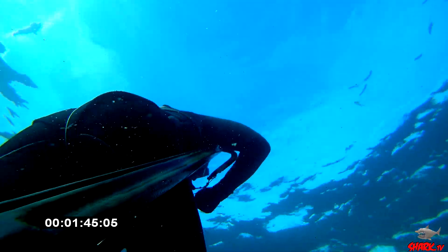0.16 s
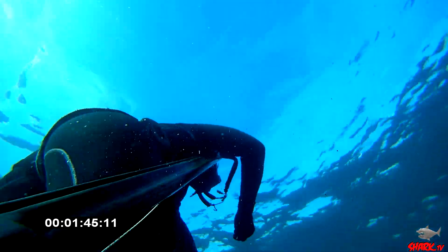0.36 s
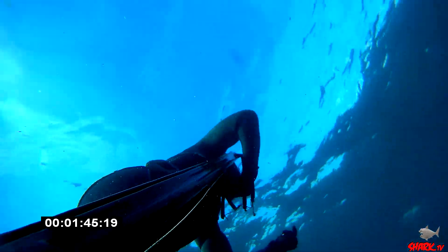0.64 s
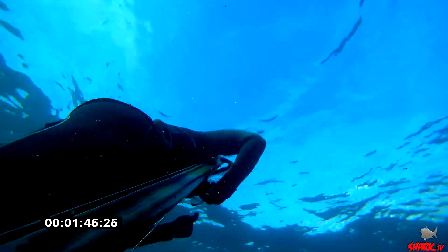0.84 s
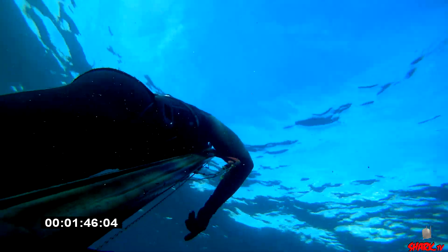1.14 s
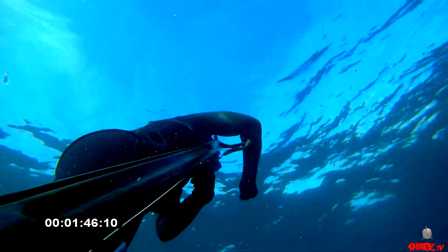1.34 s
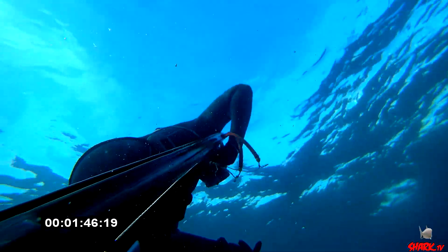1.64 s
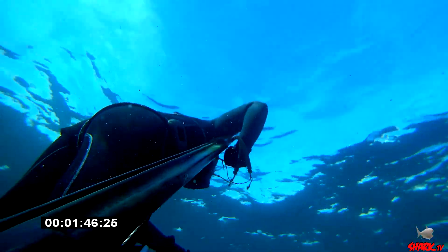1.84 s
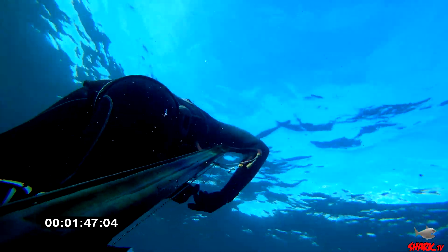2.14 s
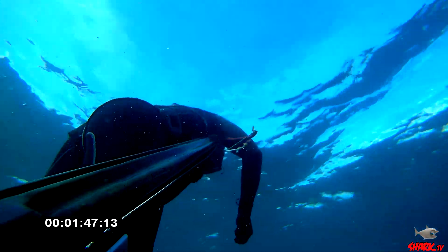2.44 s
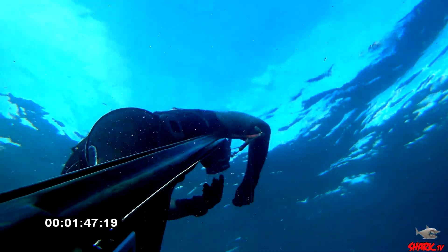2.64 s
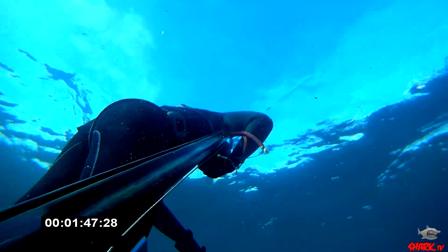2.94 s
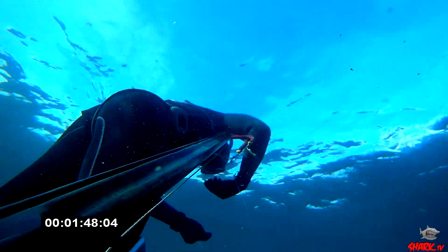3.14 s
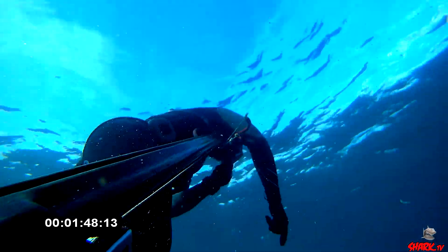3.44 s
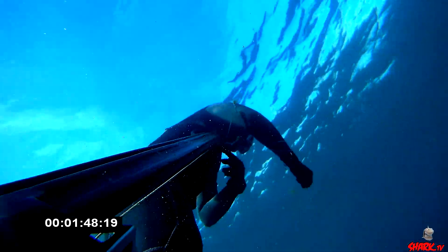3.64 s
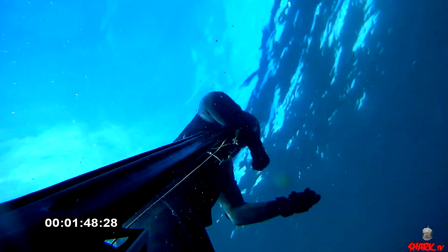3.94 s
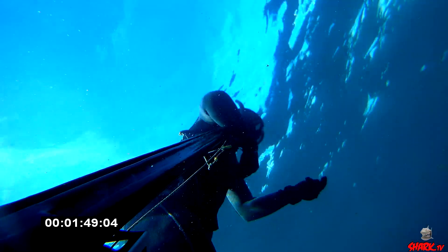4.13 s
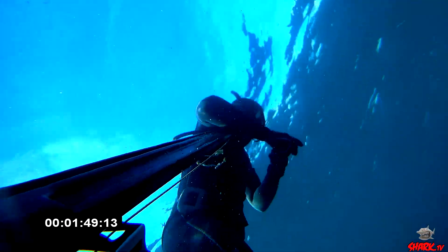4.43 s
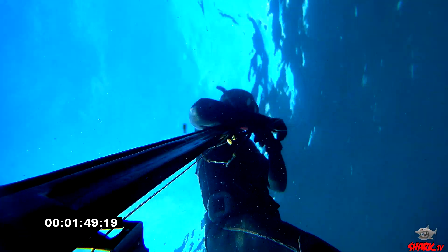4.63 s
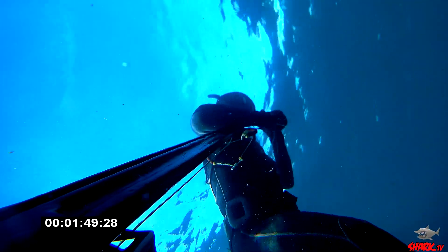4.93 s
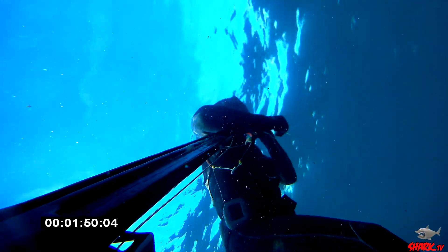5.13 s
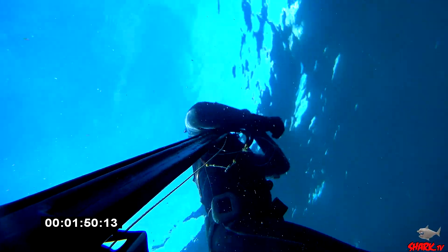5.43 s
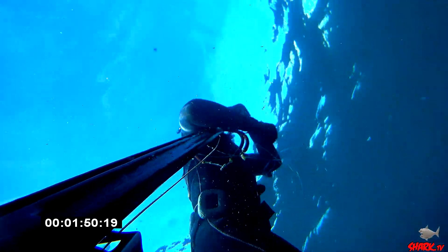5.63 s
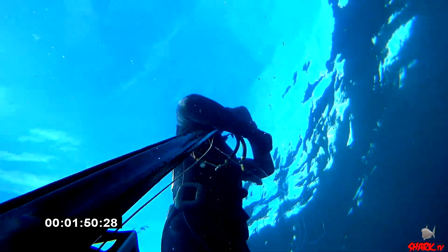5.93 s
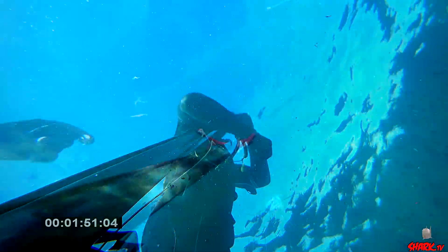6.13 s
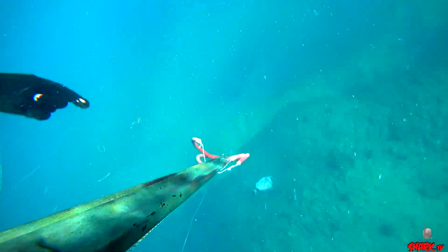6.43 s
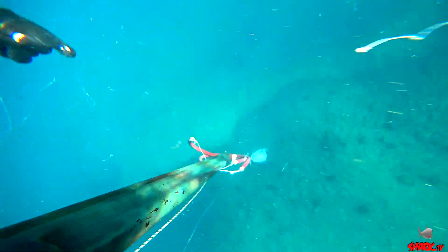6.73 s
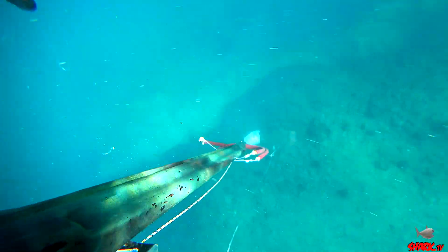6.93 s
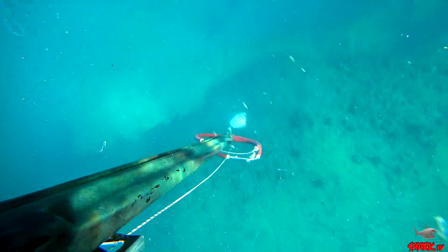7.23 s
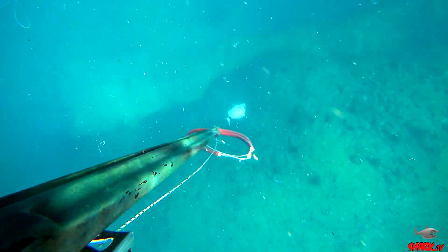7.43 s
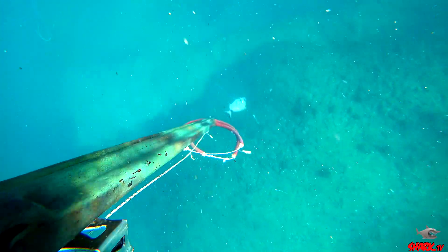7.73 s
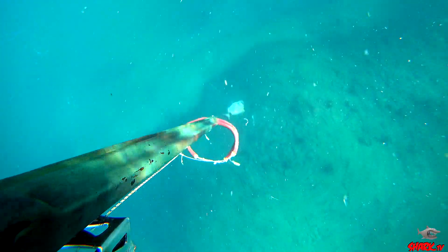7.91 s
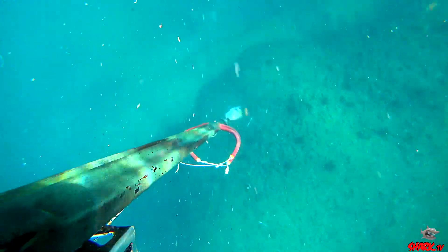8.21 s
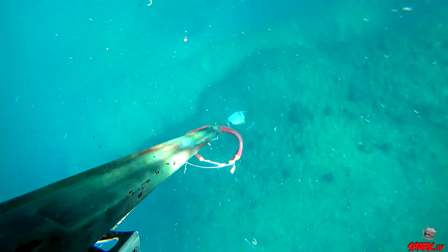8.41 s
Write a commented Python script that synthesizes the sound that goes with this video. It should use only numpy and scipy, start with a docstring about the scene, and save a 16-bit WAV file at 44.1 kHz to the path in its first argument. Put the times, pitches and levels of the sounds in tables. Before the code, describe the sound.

A speargun is handled under water, heard through its body by two attached microphones. Low shuddering and thumps dominate the first three seconds, broken by a hard pressure-like snap. Woody, hollow knocks cluster again around four seconds; things calm at five. Later come small taps, short ringing pings, line rubbing and a tiny thin squeak. Dry crackling ticks and faint hiss continue throughout, wide and without room echo.

```python
"""Under water, a speargun's barrel hums low over a soft sea hiss, then hands and line rub and knock the gun.
Near the start one sharp snap jolts the sealed camera housing that it carries; snapping shrimp tick all round.
The hum is two wavering tones; knocks, scrapes and rubbing are noise that rings the modes of gun and housing.
Sound borne by the gun shakes the two microphone ports mostly in opposite directions;
ticks are noise bursts that ring the housing window, and the sea is shaped noise."""
import sys
import numpy as np
from scipy import signal
from scipy.io import wavfile
from scipy.ndimage import uniform_filter1d

SR = 44100
rng = np.random.default_rng(int(sys.argv[2]) if len(sys.argv) > 2 else 0)


def to_wav(s):
    """Save 16-bit WAV."""
    ch = np.atleast_2d(s).T  # columns
    pcm = np.round(np.clip(ch, -1, 1) * 32767)  # PCM
    wavfile.write(sys.argv[1], SR, pcm.astype(np.int16))


N = 377915

# Modes of gun and housing: [f/Hz, damping/Hz (decay rate over 2 pi), left level/dB, right level/dB,
# lead of the inverted right port/rad]
GUN_MODES = [(114, 38, -22, -11.5, -0.15), (216, 24.7, -13, 2.5, -0.14), (281, 22.4, -4, 3, 0.47),
             (411.5, 51.4, -6, -1.5, -0.2), (484, 41, -8.5, -9.5, 0.23), (589, 48, -4, -17, 0.029),
             (641.6, 45.6, 3.5, -4.5, 0.36), (687.4, 76, 1, 0.5, 0.071), (861, 49, -3.5, -8.5, -0.27),
             (963, 40.4, -8, -3.5, -0.71), (1060, 68, -12, -10.5, -0.65), (1258, 63, -24, -16, -1.2),
             (1516, 102, -17.5, -21, -1.33), (1944, 170, -18.5, -19, -0.98), (2820, 310, -29.5, -30, 1),
             (3690, 530, -41, -37, 1), (5100, 1030, -41, -38.5, 1)]
MODE_HZ = np.array(GUN_MODES)[:, 0]
HIGH = MODE_HZ > 540
# harder contact favours the higher modes more, up to 2 kHz
HARDNESS = HIGH * (1 + 0.48 * np.log2(np.minimum(MODE_HZ, 2000) / 640))


def amp(db):
    """Amplitude ratio of a level in dB."""
    return 10 ** (np.asarray(db) / 20)


def evened(x):
    """Scale to rms 1."""
    return x / np.sqrt(np.mean(x ** 2) + 1e-20)


def add(mix, s, sound):
    """Lay a sound into the mix at s seconds, cut off at the end."""
    part = mix[:, round(s * SR):][:, :sound.shape[1]]
    part += sound[:, :part.shape[1]]


def wander(rate_hz):
    """Slow chance of rms 1: sines up to rate_hz, the slower ones larger."""
    t = np.arange(0, N + 64, 64) / SR
    slow = sum(np.sin(2 * np.pi * (f * t + rng.random())) / np.sqrt(f)
               for f in rate_hz * np.geomspace(.05, 1, num=24))
    return np.interp(np.arange(N) / SR, t, evened(slow))


def gestures(rows, index, rise_s, sag_db_s, fall_db_s):
    """Power of gestures that rise, sag gently while held, then fall away."""
    power, t = np.zeros((1, N)), np.arange(2 * SR) / SR
    for row in rows:
        start, length = row[:2]
        fade_db = sag_db_s * t + fall_db_s * np.maximum(t - length, 0)
        level = np.minimum(t / rise_s, 1) * amp(row[index] - fade_db)
        add(power, start, level[None] ** 2)
    return power[0]


def drift_db():
    """How much the gun drifts in the hand between swings."""
    # Drift of the slow sway: [t/s, level/dB]
    drift_points = [(0, -36), (1.5, -31), (2.8, -35.5), (4.1, -37.5), (5.2, -51.5), (6.2, -40.5),
                    (8.57, -40)]
    return np.interp(np.arange(N) / SR, *np.transpose(drift_points))


def sway_levels():
    """Size of the slow and the fast sway: the drift plus the swings."""
    # Swings of the barrel: [start t/s, length/s, slow sway level/dB, fast sway level/dB]
    swing_rows = [(0.0, 0.15, -56.5, -29.5), (0.41, 0.36, -17, -20), (1.14, 0.22, -21, -15),
                  (1.66, 0.2, -24.5, -36), (1.81, 0.33, -17, -18), (2.26, 0.31, -20, -23),
                  (3.33, 0.43, -49, -31), (3.72, 0.19, -34.5, -32), (4.48, 0.12, -40.5, -29.5),
                  (6.42, 0.44, -38.5, -36), (7.82, 0.072, -26.5, -33)]
    rise_s, sag_db_s, fall_db_s = 0.024, (4, 40.5), (112, 134)  # slow and fast sway
    fast_db, fast_growth = -4.5, 1.124  # the fast sway lies lower and follows the drift more steeply
    drift = drift_db()
    fast_drift = fast_db + drift + (fast_growth - 1) * (drift - drift.max())
    rest = amp([drift, fast_drift])
    swung = [gestures(swing_rows, 2 + k, rise_s, sag_db_s[k], fall_db_s[k]) for k in range(2)]
    return np.sqrt(rest ** 2 + swung)


def sway(levels):
    """The barrel bends at wavering pitches; large swings push the two membranes out of their linear range."""
    # Bending of the barrel: [f/Hz, wavering of f/Hz, left over right level/dB]
    bends = [(26.5, 1, -6), (48, 6.5, -7)]
    out = np.zeros((2, N))
    for (hz, wavering, pan_db), level in zip(bends, levels):
        phase = 2 * np.pi * np.cumsum(hz + wavering * wander(9)) / SR
        tone = np.sin(phase) * amp(3.34 * wander(33))
        sides = amp([[pan_db / 2], [-pan_db / 2]])
        out += evened(tone) * level * sides / sides.mean()
    # the squared swing bends the ports in opposite directions
    warp = signal.sosfilt(signal.butter(2, 14, "high", fs=SR, output="sos"), out.mean(0) ** 2)
    stiff = 0.21  # the left membrane stiffens towards this swing
    out[0] = stiff * np.tanh(out[0] / stiff)
    return out + 4.9 * warp * np.array([[-1], [1]])


def buffeting(levels):
    """Water shoved past with the fast sway thumps each port on its own: low noise in a narrow band."""
    band = signal.butter(2, [68, 100], "band", fs=SR, output="sos")
    thumps = signal.sosfilt(band, rng.standard_normal((2, N)))
    lumpy_db = 3
    return amp([[-8], [-6]]) * evened(thumps * amp(lumpy_db * wander(25))) * levels[1]


def rings():
    """Impulse response of each gun mode at the two ports, with a soft start that keeps its skirts steep."""
    hz, damping, left_db, right_db, lead = np.transpose(GUN_MODES)[:, :, None]
    t = np.arange(SR // 5) / SR
    fade, turn = 2 * np.pi * damping * t, 2 * np.pi * hz * t
    sign = (-1.) ** np.arange(len(GUN_MODES))[:, None]  # neighbours swing in opposite sense
    shape = sign * damping * fade * np.exp(-fade)
    left = amp(left_db) * shape * np.sin(turn)
    right = -amp(right_db) * shape * np.sin(turn + lead)
    return np.stack([left, right], axis=1)


def knocks(ring):
    """A first contact and a rattle after it; each spot that is hit favours other modes."""
    # Knocks: [t/s, peak level over both ports/dB, high over low modes level/dB, length of the rattle/ms]
    knock_rows = [(0.208, -24, -8, 2.6), (0.485, -6, -7.5, 12), (0.625, -6.5, 1, 9.7),
                  (1.002, -20.5, -3.5, 19), (1.14, -17, -17, 25), (1.369, -20, -3.5, 4),
                  (1.789, -8, -1.5, 7.1), (2.236, -21.5, -4, 10), (2.366, -19.5, -24, 12),
                  (3.039, -23.5, -9.5, 15.5), (3.489, -27.5, 3, 5.8), (3.544, -24, 1.5, 28),
                  (3.657, -13, -6, 3), (3.803, -3.5, -1, 8), (3.822, -9.5, -3, 10.6),
                  (3.881, -17, -2.5, 6.6), (3.944, -28, 23, 10.3), (3.962, -12.5, -2.5, 5.7),
                  (3.991, -24, 0, 10.5), (4.522, -16.5, 3, 5.4), (4.704, -10, -12, 8),
                  (5.543, -29.5, -5, 3.5), (5.981, -27, 0.5, 1.8), (6.034, -30.5, -1.5, 2.5),
                  (6.089, -27.5, -21, 8), (6.423, -20.5, -13, 7.1), (6.624, -16, -10.5, 6.4),
                  (6.864, -29.5, 12, 7.1), (6.876, -23, 13, 7.1), (7.169, -10.5, -3.5, 3.1),
                  (7.314, -28.5, 1, 3), (7.348, -24.5, 0, 2.8), (7.626, -33.5, 13, 5.9),
                  (7.943, -29.5, 26, 1.8), (8.168, -24.5, 1.5, 10.7), (8.287, -28.5, 5, 5),
                  (8.533, -24, 6, 10.5), (8.554, -21, 19, 5.1)]
    out, t = np.zeros((2, N)), np.arange(6000) / SR
    spread_db = 1.5
    for s, db, high_db, ms in knock_rows:
        spot, rattle = rng.standard_normal(len(GUN_MODES)), rng.standard_normal(len(t))
        body = np.tensordot(amp(spread_db * spot + high_db * HARDNESS), ring, 1)
        length = max(ms, 1) / 1000
        onset = 1 - np.exp(-t / (0.00047 + 0.017 * length))
        tap = np.exp(-((t - .0012) / .00009) ** 2)
        # brief contacts open with a clean tap
        blow = rattle * onset * np.exp(-t / length) + min(3.0, 0.017 / length) * tap
        # padded contacts carry little treble; the hardest ones reach further
        soft_hz = np.clip(3240 * amp(0.49 * high_db), 1000, 12000)
        blow = signal.lfilter(*signal.butter(2, soft_hz, fs=SR), blow)
        sound = signal.fftconvolve(blow[None], body, axes=1)
        add(out, s, amp(db) * sound / np.sqrt((sound ** 2).mean(0)).max())
    return out


def snap():
    """A crack opposite in the ports, a pressure dip with a slow rebound in both, and a ring near 500 Hz."""
    snap_s = .9172
    out, t = np.zeros((2, N)), np.arange(6000) / SR
    crack = amp(-3) * np.exp(-((t - .0003) / .00009) ** 2)
    fizz = amp(-24.0) * uniform_filter1d(rng.standard_normal(len(t)), size=4) * np.exp(-t / 0.0019)
    dip = -amp(2.2) * (1 - np.exp(-t / .0005)) * np.exp(-t / .0022)
    rebound = amp(.3) * np.exp(-t / .009) * np.sin(2 * np.pi * 27 * t)
    ring = -amp(-19 - 60 * t / .08) * (1 - np.exp(-t / .003)) * np.sin(2 * np.pi * 500 * t)
    both = dip + rebound + fizz
    add(out, snap_s, np.array([both + crack + ring, both - amp(-4) * crack - ring]))
    return out


def rub_level(k):
    """Pressure on the low (0) or high (1) modes: the strokes over the drift."""
    # Strokes of glove and line: [start t/s, length/s, low modes drive level/dB, high modes drive level/dB]
    stroke_rows = [(0.22, 0.32, -50, -49.5), (0.57, 0.35, -39, -48), (0.97, 0.13, -50, -51.5),
                   (1.14, 0.21, -41.5, -45), (1.59, 0.21, -44, -50), (1.82, 0.25, -35, -44.5),
                   (2.09, 0.6, -43.5, -50.5), (2.88, 0.19, -50, -57), (3.47, 0.31, -44.5, -46.5),
                   (3.81, 0.26, -41, -47), (4.19, 0.19, -49.5, -52.5), (4.44, 0.11, -43, -45),
                   (5.86, 0.043, -57, -56), (6.64, 0.28, -50, -59), (6.87, 0.23, -43.5, -44.5),
                   (7.03, 0.16, -42, -40.5), (7.745, 0.056, -58.5, -49), (8.0, 0.095, -47.5, -53),
                   (8.16, 0.093, -46, -44.5)]
    held = gestures(stroke_rows, 2 + k, rise_s=0.0095, sag_db_s=4, fall_db_s=251)
    under_drift_db = (-20, -26)  # faint rubbing that goes with the drift, on low and high modes
    return np.sqrt(held + amp(drift_db() + under_drift_db[k]) ** 2)


def rubbing(ring):
    """Clumped slips of glove and line wander over the gun, so each mode is stirred in its own bursts."""
    out, clumps = np.zeros((2, N)), amp(3.15 * wander(80) + 1.5 * wander(18))
    bright_db_oct = 0.5  # above 1.5 kHz rubbing stirs the modes more than knocks do
    bright_db = bright_db_oct * np.log2(np.maximum(MODE_HZ / 1500, 1))
    ring = ring * amp(bright_db)[:, None, None]
    slips_per_s = 1500
    slips = amp(2.83 * np.minimum(rng.exponential(1, N), 5)) * (rng.random(N) < slips_per_s / SR)
    for k, group in enumerate((~HIGH, HIGH)):
        pressure = evened(slips * clumps) * rub_level(k)
        scale = np.linalg.norm(ring[group].mean(1))
        for mode in ring[group]:
            drive = pressure * rng.standard_normal(N) * evened(amp(2.84 * wander(30)))
            out += signal.oaconvolve(drive[None], mode[:, :4000] / scale, axes=1)[:, :N]
    return out


def scrapes(ring):
    """Gritty noise swells to a peak and dies away; it reaches the top modes far more than a padded knock does."""
    # Scrapes along the gun: [peak t/s, peak rms level/dB, high over low modes level/dB, rise/ms, fall/ms]
    scrape_rows = [(0.438, -20.5, 1.5, 40, 8.4), (0.501, -28, 10, 17, 10), (1.219, -22.5, 0, 4.6, 16),
                   (1.256, -23, -2.5, 12.2, 9.9), (1.322, -21, -5.5, 40.3, 16), (1.391, -27.5, -2, 12, 6.4),
                   (1.8, -31, 3, 6, 30), (1.965, -22, -1, 3, 50), (4.05, -26.5, -2, 23, 9.1),
                   (7.803, -36.5, 14, 25, 12)]
    bright_db_oct, grit_db = 0.6, 4  # lift of the modes above 2 kHz; lumpiness of the contact
    out, t = np.zeros((2, N)), np.arange(12000) / SR
    bright_db = bright_db_oct * np.log2(np.maximum(MODE_HZ / 2000, 1))
    for s, db, high_db, rise_ms, fall_ms in scrape_rows:
        spot = rng.standard_normal(len(GUN_MODES))
        noise, lump = rng.standard_normal((2, len(t)))
        body = np.tensordot(amp(spot + high_db * HARDNESS + bright_db), ring, 1)
        rise, fall = max(rise_ms, 1) / 1000, max(fall_ms, 1) / 1000
        swell = np.minimum(t / rise, 1) ** 2 * np.exp(-np.maximum(t - rise, 0) / fall)
        grit = amp(grit_db * evened(uniform_filter1d(lump, size=130)))
        sound = signal.fftconvolve((noise * swell * grit)[None], body, axes=1)
        peak_rms = np.sqrt(uniform_filter1d((sound ** 2).mean(0), size=400).max())
        add(out, s - rise, amp(db) * sound / peak_rms)
    return out


def pings():
    """Small parts ring at one pitch, opposite in the ports and stronger in the right."""
    # Pings: [t/s, level of the ports' mean before onset and decay/dB, f/Hz, fall by 60 dB/s]
    ping_rows = [(1.058, -31, 1060, 0.039), (1.676, -54.5, 2910, 0.098), (1.689, -38.5, 1506, 0.086),
                 (4.656, -31, 1017, 0.055), (6.4206, -17, 1387, 0.038), (6.4657, -27.5, 1290, 0.017),
                 (6.878, -28, 1035, 0.031), (6.966, -30, 1013, 0.063), (8.554, -37, 2020, 0.033)]
    out, t = np.zeros((2, N)), np.arange(4000) / SR
    for s, db, hz, t60 in ping_rows:
        tone = amp(db - 60 * t / t60) * (1 - np.exp(-t / 0.00094)) * np.sin(2 * np.pi * hz * t)
        add(out, s, tone * np.array([[-1.1], [3.1]]))
    return out


def squeak():
    """A thin fizzy squeak: noise in one narrow band that swells and fades, opposite in the ports."""
    # Squeak: [length/s, level of the ports' mean before the swell/dB, f/Hz, bandwidth/Hz]
    squeak_row = (.065, -59.5, 5050, 500)
    squeak_s = 7.335
    length, db, hz, width = squeak_row
    out, t = np.zeros((2, N)), np.arange(0, length, 1 / SR)
    band = signal.butter(2, [hz - width / 2, hz + width / 2], "band", fs=SR, output="sos")
    fizz = evened(signal.sosfilt(band, rng.standard_normal(SR // 5))[:len(t)])
    swell = np.sin(np.pi * t / length)
    add(out, squeak_s, amp(db) * swell * fizz * np.array([[-.4], [2.4]]))
    return out


def tick(hz, noise):
    """A short crackle that rings the housing window; low ticks lean right, high ticks left."""
    port_lag = 6  # samples by which the window's ring reaches the left port later
    t = np.arange(len(noise)) / SR
    burst = noise * (np.exp(-t / 0.00049) + 0.12 * np.exp(-t / 0.012))
    window = np.exp(-np.pi * 1300 * t) * np.sin(2 * np.pi * hz * t)
    tone = signal.fftconvolve(burst, window)[:len(t)]
    lean = amp((hz - 6100) / 1000)
    pair = np.array([lean * np.pad(tone, (port_lag, 0)), np.pad(tone, (0, port_lag)) / lean])
    # the brightest part arrives in both ports together
    edge = np.pad(np.diff(uniform_filter1d(burst, size=3), 2), (0, port_lag + 2))
    return pair / abs(pair.mean(0)).max() + 0.32 * edge


def shrimp():
    """Near snaps from the table, and small volleys of mostly fainter far ones."""
    # Near shrimp: [t/s, peak level of the window's ring/dB, f/Hz]
    near = [(0.211, -44, 4940), (0.2588, -43, 5370), (0.3079, -34.5, 4700), (0.388, -39, 5170),
            (1.146, -30, 4570), (1.3717, -44, 5090), (1.563, -44, 5300), (1.796, -41.5, 7500),
            (2.0587, -46, 5500), (2.091, -46, 7820), (2.4134, -39, 6940), (2.4383, -37, 4900),
            (2.498, -41, 6830), (2.6299, -49, 7700), (3.1397, -37.5, 7150), (3.24, -38, 5350),
            (3.5034, -34, 6750), (3.5887, -43.5, 7100), (3.6624, -40, 7400), (3.873, -47, 6900),
            (3.9465, -36, 7540), (4.118, -43, 7470), (4.1485, -45, 6900), (4.4116, -32, 4600),
            (5.012, -28, 4870), (5.0736, -42.5, 5430), (5.437, -32, 4700), (5.5607, -39.5, 6700),
            (5.8594, -37, 7660), (6.097, -36, 4730), (6.1848, -37, 7100), (6.309, -42.5, 7200),
            (6.6866, -45, 5050), (6.7086, -34, 5000), (6.8102, -41.5, 4700), (7.2245, -43.5, 5420),
            (7.2853, -45.5, 7060), (7.6324, -46, 5660), (7.7623, -40, 7000), (7.9475, -33, 6400)]
    out, far, volley = np.zeros((2, N)), 600, 3
    for s, db, hz in near:
        add(out, s, amp(db) * tick(hz, rng.standard_normal(900)))
    starts = np.repeat(rng.random(far // volley) * N / SR, volley)
    for start in starts:
        late, size, pitch = rng.random(3)
        noise = rng.standard_normal(900)
        hz = (5200 if pitch < .4 else 7250) * (1 + 0.056 * noise[-1])
        add(out, start + .15 * late, amp(-62.5 + 13.4 * size ** 2) * tick(hz, noise))
    return out


def hiss(points, db):
    """Steady noise of a given spectrum and rms level, with faint drifting patches."""
    frames, hz = N // 256 + 5, np.fft.rfftfreq(1024, 1 / SR)
    a, b, patches = rng.standard_normal((frames, 513, 3)).T
    patches_db = evened(uniform_filter1d(uniform_filter1d(patches, size=12, axis=0), size=8, axis=1))
    f, level_db = np.transpose(points)
    spectrum_db = np.interp(np.log(hz + 1), np.log(f + 1), level_db)[:, None]
    z = (a + 1j * b) * amp(spectrum_db + patches_db)
    return amp(db) * evened(signal.istft(z, nperseg=1024, noverlap=768)[1][:N])


def sea_hiss():
    """Soft background: one noise alike in both ports, another opposite in them."""
    # Spectrum of the part alike in both ports: [f/Hz, relative level per Hz/dB]
    mid_points = [(60, -28.5), (146, -15), (480, -20), (880, -20.5), (1380, -12.5), (2150, -20.5),
                  (2500, -25.5), (4120, -30.5), (14200, -35), (16000, -37)]
    # Spectrum of the part opposite in the ports: [f/Hz, relative level per Hz/dB]
    side_points = [(60, -9), (139, -29), (515, -42), (1010, 4), (1310, 8), (1580, 0.5), (2150, -2.5),
                   (2500, -9), (5210, -15.5), (8920, -27), (13600, -25.5), (16000, -50)]
    mid, side = hiss(mid_points, db=-61), hiss(side_points, db=-55.5)
    return np.array([mid + side, mid - side])


def scene():
    """Everything the gun carries to the ports, then the shrimp and the sea around it."""
    ring, levels = rings(), sway_levels()
    gun = sway(levels) + buffeting(levels)
    gun += knocks(ring) + snap() + rubbing(ring) + scrapes(ring) + pings() + squeak()
    return gun + shrimp() + sea_hiss()


def record(dry):
    """The input stage saturates near full scale; then the band limit."""
    knee, edge_hz = 6, 15900  # sharpness of the saturation; top of the band in Hz
    saturated = dry / (1 + abs(dry) ** knee) ** (1 / knee)
    low_pass = signal.firwin(511, edge_hz, window=("kaiser", 9), fs=SR)
    return signal.oaconvolve(saturated, low_pass[None], "same", axes=1)


dry = scene()
out = record(dry)
to_wav(out)
```